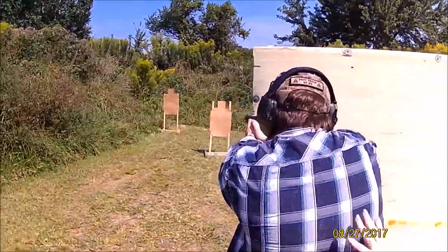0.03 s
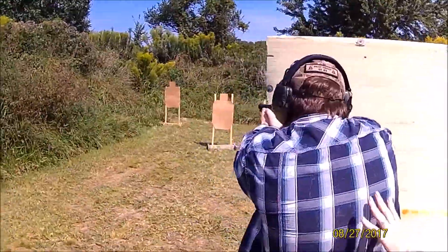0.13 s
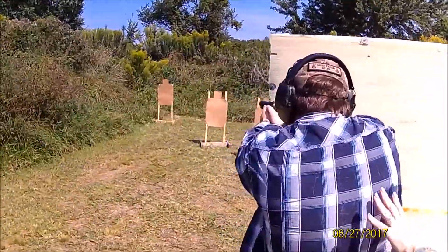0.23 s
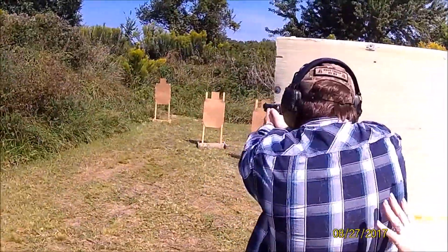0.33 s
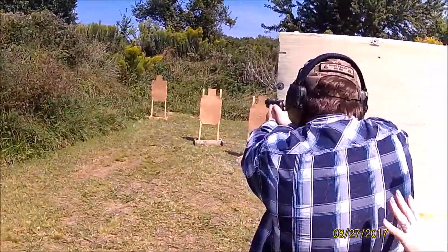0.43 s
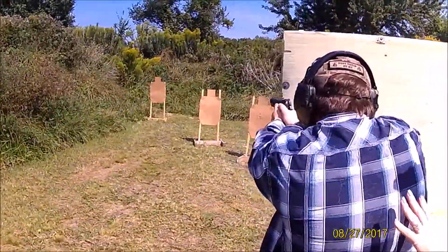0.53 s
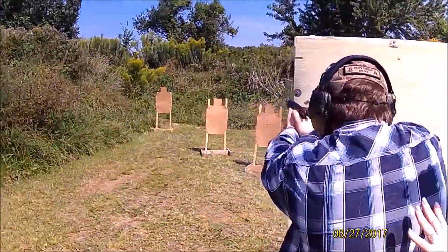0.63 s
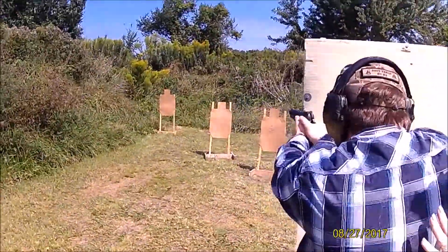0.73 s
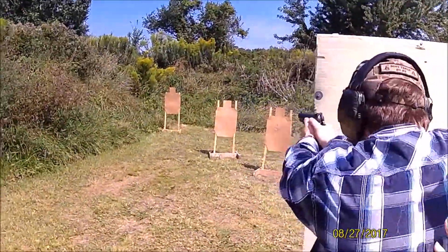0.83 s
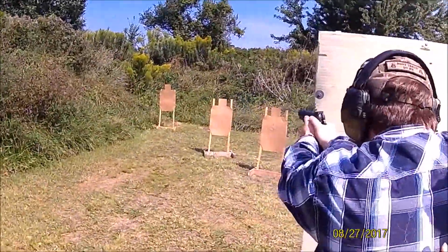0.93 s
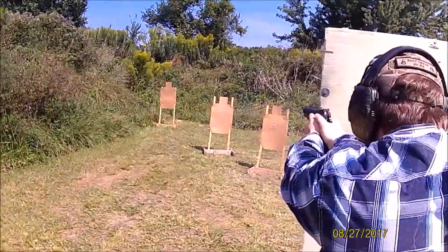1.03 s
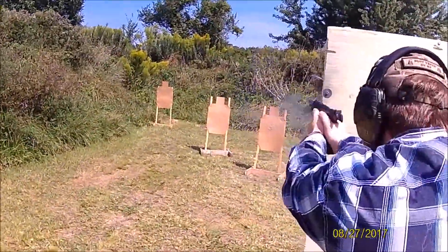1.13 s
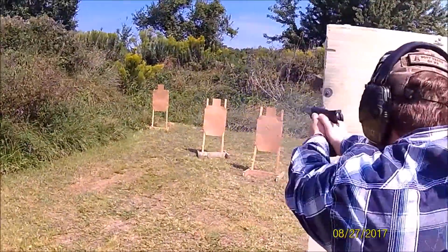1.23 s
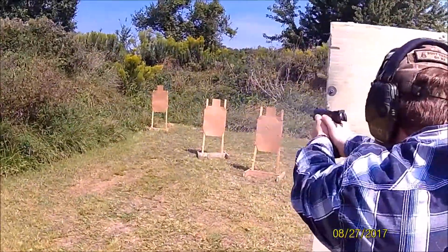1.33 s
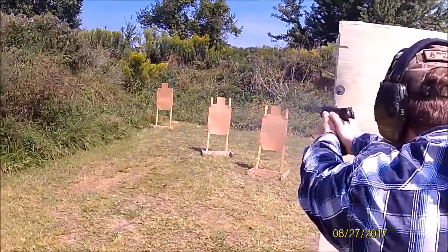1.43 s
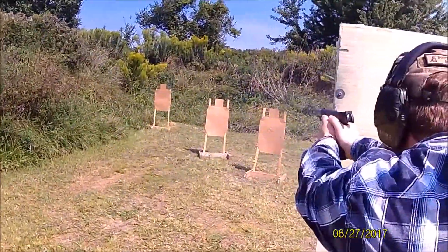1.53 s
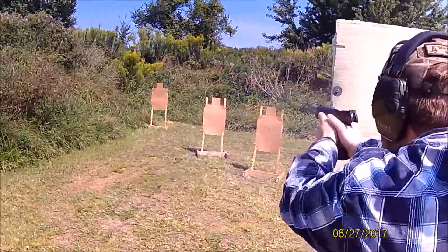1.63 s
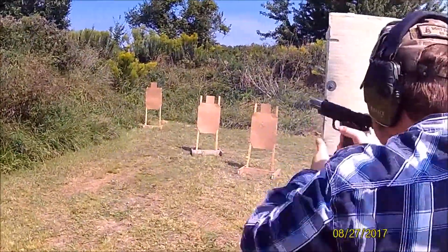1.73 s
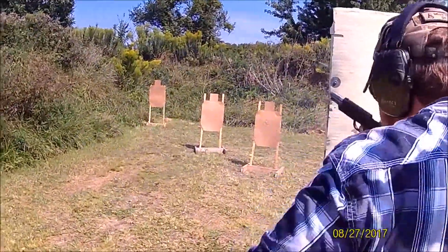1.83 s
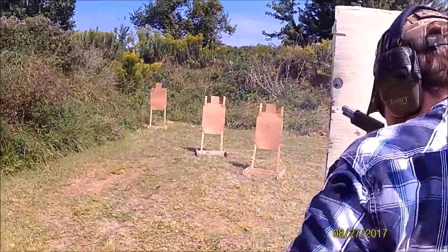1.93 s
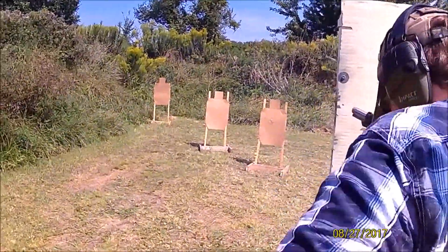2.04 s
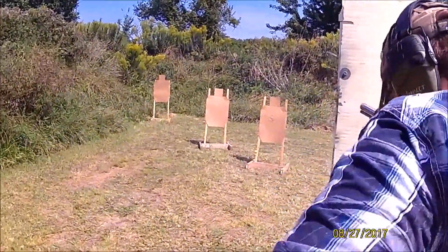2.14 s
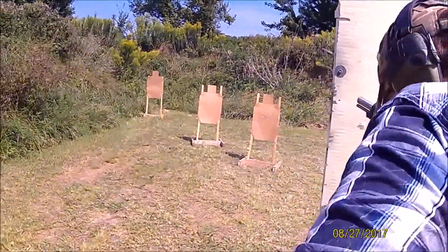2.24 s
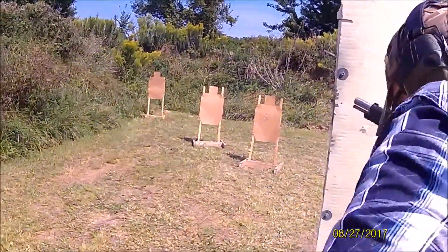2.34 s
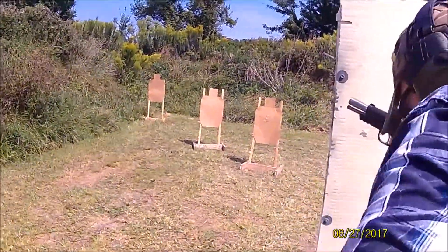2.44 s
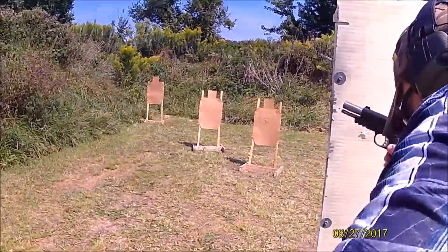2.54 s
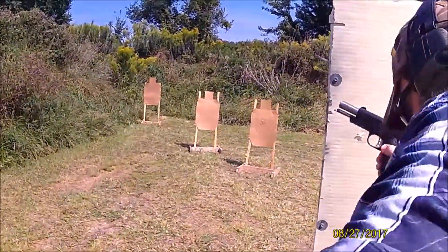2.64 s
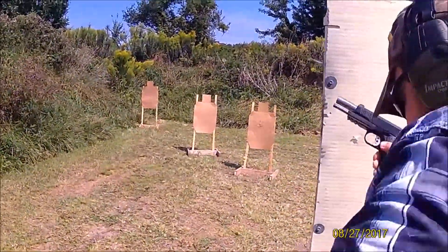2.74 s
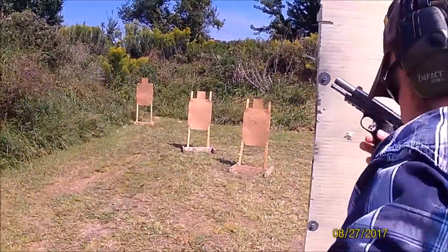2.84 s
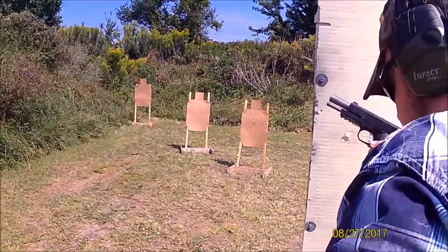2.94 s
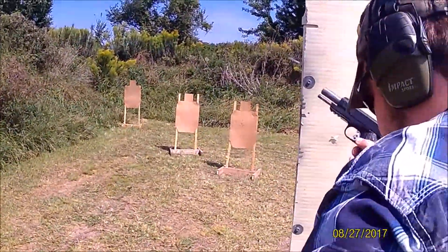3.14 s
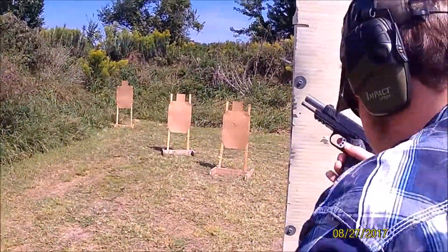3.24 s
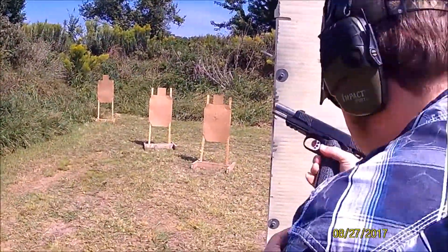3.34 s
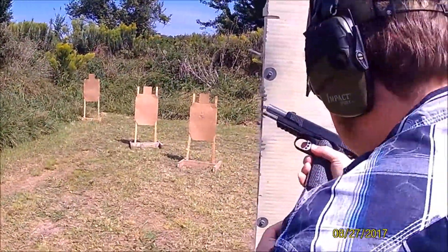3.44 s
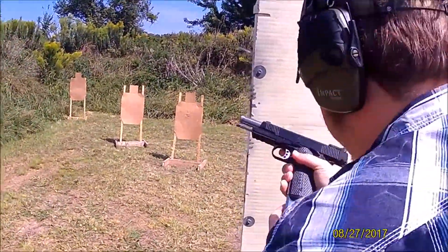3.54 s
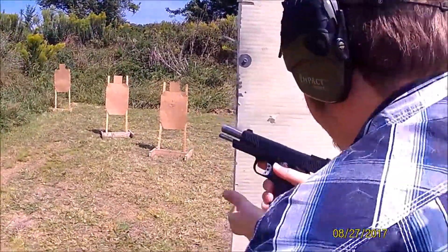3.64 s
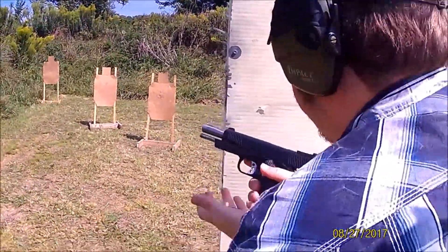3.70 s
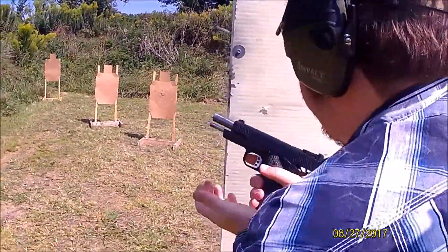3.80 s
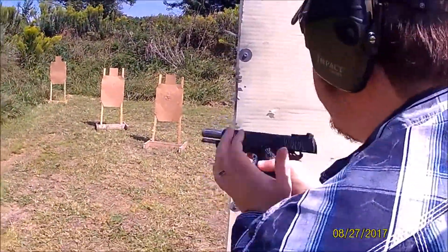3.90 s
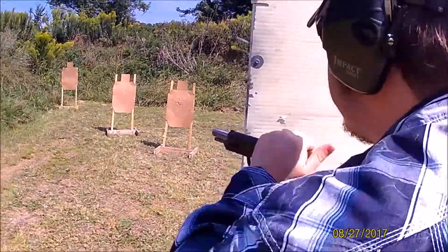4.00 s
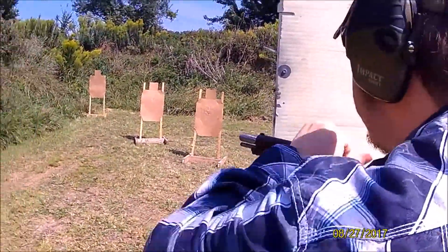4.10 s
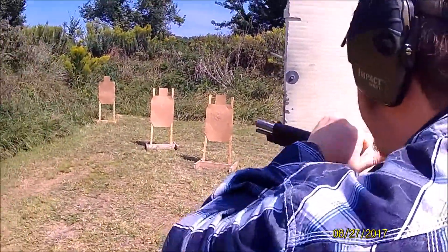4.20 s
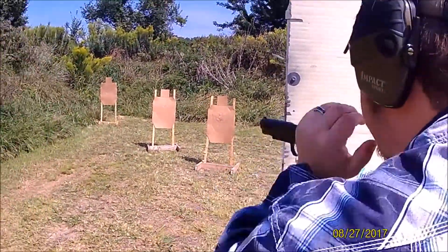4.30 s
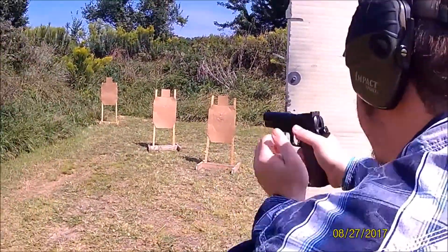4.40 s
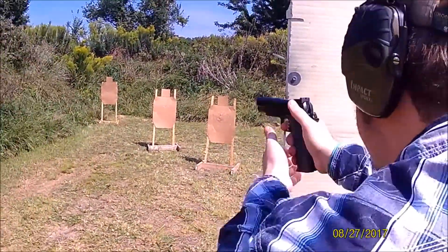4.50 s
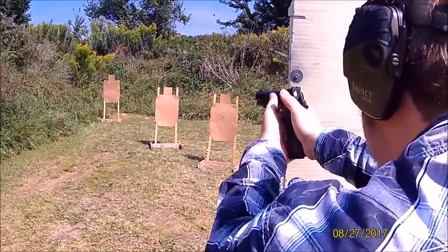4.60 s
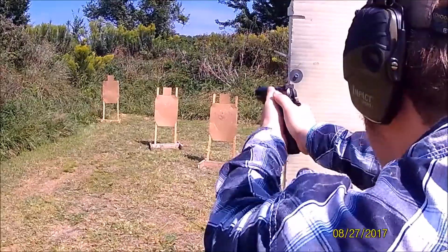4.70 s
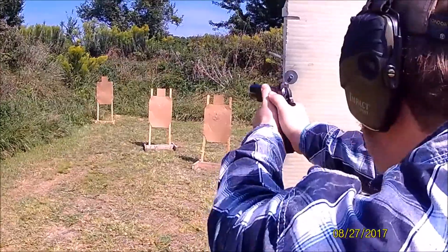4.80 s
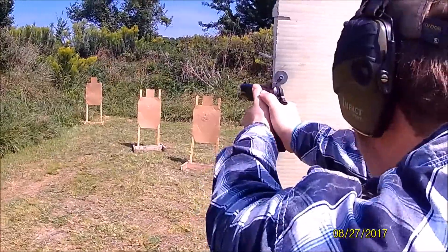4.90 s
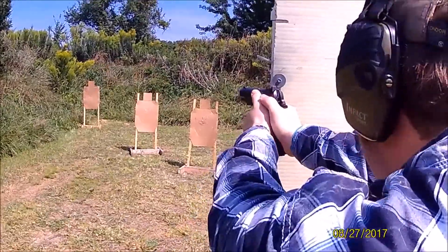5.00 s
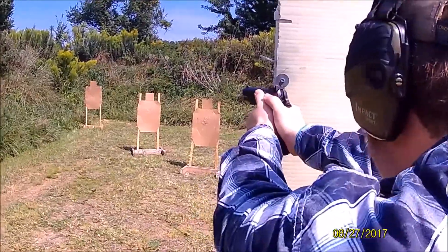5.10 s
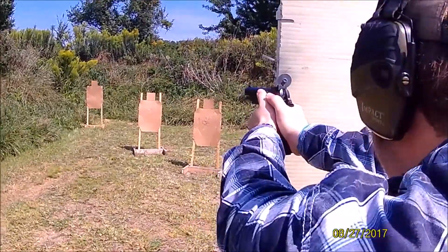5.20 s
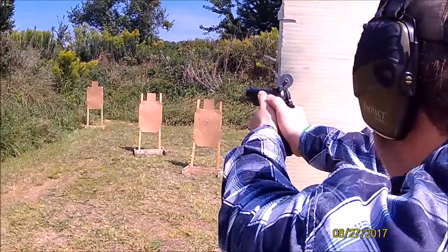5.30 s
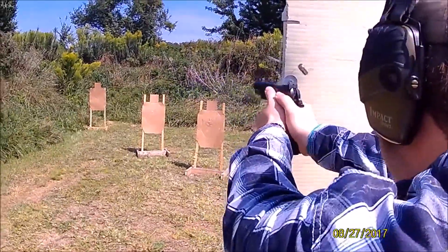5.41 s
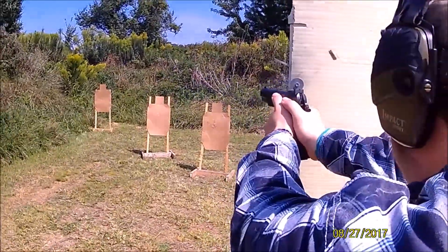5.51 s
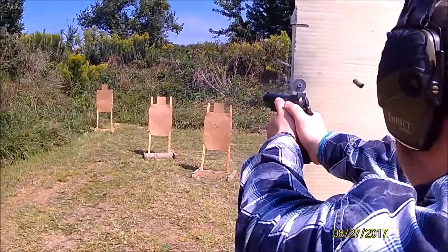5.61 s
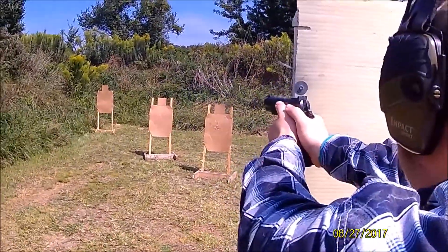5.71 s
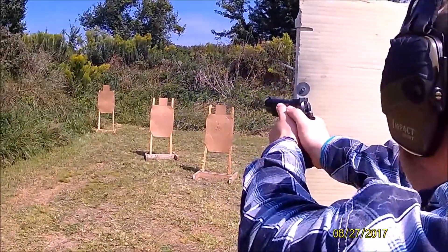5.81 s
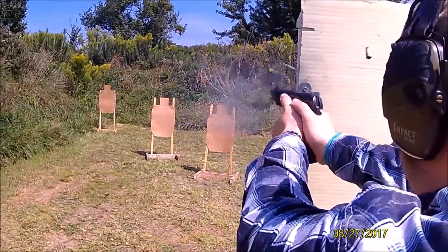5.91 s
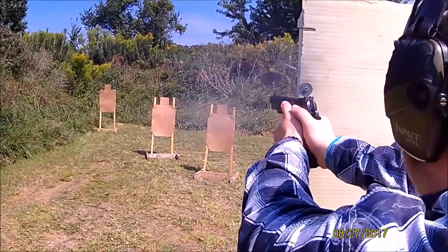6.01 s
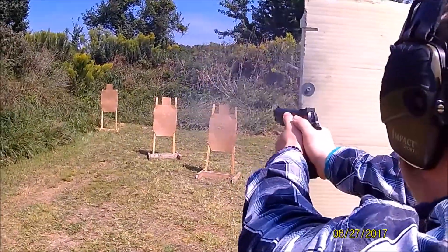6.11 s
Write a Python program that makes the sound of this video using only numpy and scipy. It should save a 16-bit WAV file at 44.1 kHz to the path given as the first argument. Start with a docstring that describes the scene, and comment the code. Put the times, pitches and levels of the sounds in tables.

```python
"""Two pairs of loud, distorted pistol shots, with a reload between them and single shots further off.
It is a match between earth banks, heard from a small hand-held camera just behind the shooter.
The close blasts overload the microphone; shots from the next bay ring its port (the sound hole).
Echoes roll back from the banks. Fingers knock and rub on the camera's shell, and during the reload
the pistol's steel parts click, scrape and slam over a soft bed of open air."""
import sys
import numpy as np
from scipy import signal
from scipy.fft import rfft, irfft, next_fast_len
from scipy.io import wavfile

SR = 44100
rng = np.random.default_rng(int(sys.argv[2]) if len(sys.argv) > 2 else 0)


def master_out(mix):
    """Clip the mix to full scale and print it as 16-bit PCM to the path in sys.argv[1]."""
    frames = np.transpose(np.atleast_2d(mix))
    ceiling = np.clip(frames, -1, 1)
    pcm = np.round(ceiling * 32767).astype(np.int16)
    wavfile.write(sys.argv[1], SR, pcm)


N = 271201
TIME = np.arange(N) / SR

# The shooter's own shots:
# (time [s], blast [dB], slap off the bank [dB], crack time [s], crack [dB], tail [dB])
NEAR_SHOTS = [(0.5867, 18.5, -7, 0.6682, -9.5, -33), (1.0752, 19, 3, 1.1445, -24, -28.5),
              (5.326, 20.5, -6.5, 5.405, -13, -34), (5.8322, 19.5, 0.5, 5.9042, -10.5, -34)]
# Shots in the next bay; t60 always means the time a sound takes to fade by 60 dB:
# (time [s], blast [dB], port pitch [Hz], port t60 [s], overtone [dB], echo [dB])
FAR_SHOTS = [(0.371, 14.5, 1300, 0.015, -24, -31.5), (1.4024, 17, 1263, 0.0094, -11, -27.5),
             (2.4246, 13.5, 1328, 0.0099, -8, -24), (3.4269, 11.5, 1322, 0.02, -40.5, -24),
             (3.6465, 12.5, 1300, 0.021, -36, -24.5)]
# The other tones that the microphone port rings with: (pitch [Hz], level [dB], t60 [s])
PORT_TONES = [(508, -13, 0.019), (800, -8.5, 0.013), (1120, -12.5, 0.004), (4370, -19, .008),
              (5460, -23.5, .005)]
# The tone colour of sharp clicks and thin cracks: (frequency [Hz], level [dB])
CLICK_COLOUR = [(200, -16.5), (700, -18.5), (1300, -0.5), (1900, 2), (2500, -5), (3200, -8), (5500, -12),
                (7500, -23.5), (15000, -28.5)]


def near_shots(port_hz=1350, port_t60=0.045, overtone_hz=2040, overtone_db=-9, overtone_t60=0.056):
    """Each blast rings the port; the bank slaps back, a crack comes from downrange, the tail swells."""
    # The tone colour of the blast: (frequency [Hz], level [dB])
    blast_colour = [(40, -27), (300, -17.5), (500, -10), (900, -8), (1150, -3), (1350, -2.5), (1550, -7.5),
                    (1850, -2.5), (2400, -18.5), (4500, -19.5), (7000, -34), (15000, -50)]
    out = np.zeros(N)
    blast = noise(blast_colour, uneven(spread_db=2.5, rate_hz=550))
    tail = echo_noise(peaks_db=-5.5, crackle_db=5)
    crack = dull(noise(CLICK_COLOUR), hz=8500, order=2)
    tones = [(port_hz, 0, port_t60), (overtone_hz, overtone_db, overtone_t60)] + PORT_TONES
    port = thin(ring(tones), hz=650)
    for s, blast_db, slap_db, crack_s, crack_db, tail_db in NEAR_SHOTS:
        add(out, s, from_db(blast_db) * port)
        fired = TIME >= s
        # Sound scatters off the ground and target stands; one firmer echo comes from close by.
        scatter = fired * from_db(-23.5) * swell(s + 0.037, rise_db_per_s=701, fall_db_per_s=471)
        out += blast * from_db(blast_db) * np.hypot(fade(s, t60=0.067), scatter)
        out += blast * from_db(blast_db - 19.5) * fade(s + 0.039, t60=0.014)
        out += blast * from_db(slap_db) * fade(s + 0.0615, t60=0.031)
        out += crack * from_db(crack_db) * fade(crack_s, t60=0.014)
        # The shot's tail swells back about 0.2 s later, as the camera's level recovers.
        tail_swell = fired * swell(s + 0.19, rise_db_per_s=131, fall_db_per_s=116.5)
        out += tail * from_db(tail_db + 3) * tail_swell
    return out


def far_shots(overtone_hz=2030, overtone_t60=0.019, wall_delay_s=0.0875, wall_db=8):
    """A blast bends over the bank and rings the port; one firm echo and a lumpy roll follow."""
    out, echoes = np.zeros(N), np.zeros(N)
    for s, blast_db, hz, t60, overtone_db, echo_db in FAR_SHOTS:
        port = ring([(hz, 0, t60), (overtone_hz, overtone_db, overtone_t60)] + PORT_TONES)
        add(out, s, from_db(blast_db) * dull(port, hz=5000, order=2))
        add(out, s + wall_delay_s, from_db(echo_db + wall_db) * dull(port, hz=1500, order=2))
        burst = from_db(18) * fade(s, t60=0.033)
        roll = from_db(9) * swell(s + 0.086, rise_db_per_s=236, fall_db_per_s=248)
        late_return = from_db(-23) * swell(s + 0.28, rise_db_per_s=60, fall_db_per_s=129.5)
        echoes += (TIME >= s) * from_db(echo_db) * (burst + np.hypot(roll, late_return))
    return out + echoes * echo_noise(peaks_db=1.5, crackle_db=3) * uneven(spread_db=1.5, rate_hz=120)


def echo_noise(peaks_db, crackle_db):
    """Countless small echoes of uneven size blur into noise, which the microphone port colours."""
    # The tone colour of the echoes: (frequency [Hz], level [dB])
    echo_colour = [(50, -25.5), (250, -28.5), (500, -11), (900, -9.5), (1300, -3.5), (1900, -7.5),
                   (2400, -17), (3600, -24.5), (4400, -20.5), (6200, -32), (6900, -43.5), (10000, -50),
                   (15000, -59)]
    # Narrow bands that the port boosts: (frequency [Hz], width [Hz], level [dB])
    port_peaks = [(1290, 100, 2.5), (1810, 90, -5), (4220, 170, 2.5), (5020, 390, -3.5), (6040, 300, 3.5)]
    echoes = noise(echo_colour, uneven(crackle_db, rate_hz=900))
    echoes += sum(from_db(db + peaks_db) * signal.lfilter(*signal.iirpeak(hz, hz / width, fs=SR), echoes)
                  for hz, width, db in port_peaks)
    return echoes / echoes.std()


def camera_knocks(thud_hz=240, rebound=0.78, case_hz=500, case_db=-8, case_t60=0.031):
    """A clack mostly rings the shell; a fingertip also pushes the whole case, with a hollow thud."""
    # Hard plastic clacks: (time [s], level [dB])
    clacks = [(.0046, -2.5), (0.0401, 0), (0.0828, 0.5)]
    # Soft fingertip bumps: (time [s], shell ring [dB], thud [dB])
    knocks = [(0.8438, -2.5, -7.5), (0.9103, -2, -10.5), (0.959, -14.5, -13.5), (1.011, -6.5, -12),
              (1.184, -5, -29), (1.236, 0, -22), (1.2411, 4, -45), (1.268, -10, -12.5), (1.305, -14.5, -12),
              (1.3477, -12.5, -26), (1.379, -7.5, -10), (1.396, -29, -10.5), (1.4112, 1.5, -4.5),
              (1.4333, -12, -8.5), (1.4834, -9, -5), (4.002, -7.5, -15), (4.0554, -11, -12),
              (4.0935, 2, -2.5), (4.163, -7.5, -6.5)]
    out = np.zeros(N)
    phase = np.pi * (thud_hz * TIME[:SR // 50] - 1)
    thud = (1 - 2 * rebound * phase ** 2) * np.exp(-phase ** 2)  # a brief smooth push and its rebound
    case = ring([(case_hz, case_db, case_t60)])
    for s, db in clacks:
        add(out, s, from_db(db) * shell_ring(bright_hz=4100, damped_t60=1.6, low_hz=707))
        add(out, s - 1 / thud_hz, from_db(db - 21) * thud)
    for s, shell_db, thud_db in knocks:
        bright_hz = 1840 * 2 ** (thud_db / 23.5)  # a firmer push sounds brighter
        add(out, s, from_db(shell_db) * shell_ring(bright_hz) + from_db(thud_db) * case)
        add(out, s - 1 / thud_hz, from_db(thud_db) * thud)
    return out


def shell_ring(bright_hz, damped_t60=0.075, low_hz=600):
    """The struck camera shell ticks and rings; a soft finger dulls the ring and stops it sooner."""
    # The shell's own tones: (pitch [Hz], level [dB], t60 [s])
    shell_tones = [(785, -5, 0.035), (1150, 3, 0.0023), (1328, -12, 0.011), (1988, -14, 0.01),
                   (2855, -15, 0.014), (3700, -15, 0.0087), (4160, -13.5, 0.01), (5700, -14, 0.007),
                   (750, -48.5, 0.71), (1320, -43.5, .18)]
    t = TIME[:SR // 4]
    tones = ring(shell_tones) * from_db(-60 * t / damped_t60)
    tick = rng.standard_normal(len(t)) * from_db(-13 - 60 * t / 0.014)
    return dull(thin(tones + tick, low_hz, order=4), bright_hz, order=2)


def grip_rub(catches_per_s=45, catch_db=11.5, scrape_db=1.5):
    """Skin rubs on the case: it rumbles, scrapes unevenly and catches at random, ticking the shell."""
    # The hand shifts its grip: (time [s], level [dB], held for [s])
    rubs = [(0.847, -13.5, 0.01), (.962, -25, 0.029), (1.071, -32.5, 0.18), (3.612, -30.5, .005),
            (4.024, -39, .06)]
    # The tone colour of skin on the case: (frequency [Hz], level [dB])
    grip_colour = [(30, 4), (110, -3.5), (450, -5.5), (600, -11), (780, -3), (950, -18), (1400, -17.5),
                   (2400, -32.5), (4300, -33), (5300, -45.5), (7300, -43), (9000, -56), (15000, -50.5)]
    pressure = sum(from_db(db) * swell(s, rise_db_per_s=901.5, fall_db_per_s=170, hold_s=hold_s)
                   for s, db, hold_s in rubs)
    scrape = dull(thin(noise(grip_colour), hz=1400), hz=7500, order=2)
    scrape *= from_db(scrape_db) * uneven(spread_db=3, rate_hz=250)
    catches = (rng.random(N) < catches_per_s / SR) * rng.random(N) * from_db(catch_db) * pressure
    rumble = dull(noise(grip_colour), hz=2500)
    ticks = signal.fftconvolve(catches, shell_ring(bright_hz=1100))[:N]
    return pressure * (rumble + scrape) + ticks


def ticks_and_reload(pull_s=4.24, pull_db=-34, slam_db=-20, slam_t60=0.054, slam_bright_hz=12500):
    """The handled camera case ticks; later the gun clicks and its slide scrapes back and slams shut."""
    # Small sharp ticks of the camera case (first second), then the gun's clicks during the reload:
    # (time [s], level [dB], t60 [s], brightness [Hz])
    handling_clicks = [(0.5558, -5, 0.019, 2700), (0.5756, -6, 0.019, 2720), (0.687, -17, 0.012, 3980),
                       (0.724, -18.5, 0.014, 2980), (0.8431, -9, 0.0075, 3850), (3.3203, -22, 0.029, 4800),
                       (3.346, -30, 0.044, 4000), (3.359, -42, 0.036, 6000), (4.113, -31.5, 0.033, 6000)]
    hiss = noise(CLICK_COLOUR)
    slam = (pull_s + 0.0215, slam_db, slam_t60, slam_bright_hz)
    clicks = sum(from_db(db) * dull(hiss * fade(s, t60), bright_hz, order=2)
                 for s, db, t60, bright_hz in handling_clicks + [slam])
    pull = from_db(pull_db) * swell(pull_s, rise_db_per_s=2500, fall_db_per_s=264) * hiss
    return clicks + pull


def steel_rings(rise_s=0.01):
    """Struck steel somewhere on the range sings with one faint tone for each hit."""
    # Hits on distant steel: (time [s], pitch [Hz], level [dB], t60 [s])
    hits = [(.45, 1776, -29.5, 2.1), (2.57, 1770, -34, 0.64), (3.84, 2015, -14, 0.042)]
    out = np.zeros(N)
    for s, hz, db, t60 in hits:
        loudness = from_db(db) * fade(s, t60) * np.tanh(since(s) / rise_s)
        out += loudness * np.sin(2 * np.pi * hz * since(s))
    return out


def woods(near_db=-47, far_db=-42, tail_t60=4.03):
    """Every shot lingers faintly and unevenly in the woods around."""
    # The tone colour of the lingering sound: (frequency [Hz], level [dB])
    woods_colour = [(100, -15), (800, -6), (1300, 4), (1900, 7.5), (2400, -9), (5000, -24.5), (8000, -43.5)]
    # Soft swells in the background: (time [s], level [dB], t60 [s])
    background_swells = [(1.655, -40, 1), (5.16, -50.5, 0.36), (5.235, -51, 0.64)]
    tails = [(shot[0], near_db, tail_t60) for shot in NEAR_SHOTS]
    tails += [(shot[0], far_db, tail_t60) for shot in FAR_SHOTS]
    power = sum((from_db(db) * fade(s, t60)) ** 2 for s, db, t60 in tails + background_swells)
    flutter = uneven(spread_db=2, rate_hz=14)
    return np.sqrt(power) * noise(woods_colour) * flutter


def open_air(level_db=-43):
    """The steady low rumble and faint hiss of the outdoors."""
    # The tone colour of the air: (frequency [Hz], level [dB])
    air_colour = [(15, -26.5), (25, 3), (116, -10.5), (140, -12), (227, -18), (260, -21.5), (331, -22.5),
                  (762, -27.5), (970, -30), (1410, -30), (2850, -39.5), (4260, -41), (10100, -48.5),
                  (13200, -49), (15500, -48)]
    return from_db(level_db) * noise(air_colour)


def whine(centre_hz=13330, wander_hz=90, level_db=-64):
    """A thin, unsteady whistle from the camera's electronics."""
    wander = dull(rng.standard_normal(N), hz=150)
    pitch_hz = centre_hz + wander_hz * wander / wander.std()
    return from_db(level_db) * np.sin(2 * np.pi * np.cumsum(pitch_hz) / SR)


def background_dips(depth_db=-8.5, sink_s=0.06, recover_s=0.0083):
    """A gain that dips briefly after loud sounds and comes back quickly."""
    # When the background is quieter: (start [s], end [s])
    dips = [(.07, 0.24), (.6, 0.6), (1.1, 1.64), (5.35, 5.57), (5.86, 6.14)]
    depth = sum(np.clip(np.minimum((TIME - start) / sink_s, (end - TIME) / recover_s), 0, 1)
                for start, end in dips)
    return from_db(depth_db * depth)


def from_db(db):
    """Turn decibels into a gain, the number that a sound is multiplied by."""
    return 10 ** (np.asarray(db) / 20)


def noise(colour, grain=1):
    """Noise of strength (rms) 1 with a (Hz, dB) tone colour; grain roughens it before it is coloured."""
    hz, db = np.transpose(colour)
    size = next_fast_len(N)
    bin_hz = np.maximum(np.arange(size // 2 + 1) * SR / size, 1)
    gain = from_db(np.interp(np.log(bin_hz), np.log(hz), db))
    gain *= bin_hz / np.hypot(bin_hz, 20)  # falls away below 20 Hz
    x = irfft(rfft(rng.standard_normal(N) * grain, size) * gain, size)[:N]
    return x / x.std()


def since(s):
    """Seconds gone by since time s, zero before."""
    return np.maximum(TIME - s, 0)


def fade(s, t60):
    """A gain that jumps to 1 at time s and dies away."""
    return (TIME >= s) * from_db(-60 * np.minimum(since(s) / t60, 4))


def swell(s, rise_db_per_s, fall_db_per_s, hold_s=0):
    """A gain that climbs to 1 at time s, holds, and falls away."""
    db = rise_db_per_s * np.maximum(s - TIME, 0) + fall_db_per_s * since(s + hold_s)
    return from_db(-np.minimum(db, 240))


def uneven(spread_db, rate_hz):
    """A gain that wanders at random around 1."""
    wander = dull(rng.standard_normal(N), rate_hz, order=2)
    return from_db(spread_db * wander / wander.std())


def ring(tones):
    """A quarter of a second of fading (Hz, dB, t60) tones, struck together."""
    t = TIME[:SR // 4]
    return sum(from_db(db - 60 * t / t60) * np.sin(2 * np.pi * hz * t) for hz, db, t60 in tones)


def dull(x, hz, order=1):
    """Soften everything above hz (a low-pass filter)."""
    return signal.sosfilt(signal.butter(order, hz, fs=SR, output="sos"), x + 1e-18)


def thin(x, hz, order=2):
    """Soften everything below hz (a high-pass filter)."""
    return signal.sosfilt(signal.butter(order, hz, "high", fs=SR, output="sos"), x + 1e-18)


def add(track, s, sound):
    """Mix a sound into the track from time s on."""
    start = max(round(s * SR), 0)
    track[start:start + len(sound)] += sound[:N - start]


def scene():
    """Shots and handling over the open-air background, in one channel."""
    background = (open_air() + woods() + whine()) * background_dips()
    shooting = near_shots() + far_shots() + steel_rings()
    return (shooting + camera_knocks() + grip_rub() + ticks_and_reload() + background)[None]


def record(dry, overload_power=0.45, power_ramp=0.04, duck_db=6.5, recover_db_per_s=80):
    """The camera flattens loud peaks, briefly turns itself down when overloaded and cuts the top treble."""
    frame_s, frame_start_s, cutoff_hz = 0.02, 0.0102, 15900
    clipped = dry[0] / (1 + dry[0] ** 8) ** (1 / 8)
    # The average power of the last short frame decides how far the level ducks.
    energy = np.cumsum(clipped ** 2) / SR
    frame_end = TIME - (TIME - frame_start_s) % frame_s
    power = (np.interp(frame_end, TIME, energy) - np.interp(frame_end - frame_s, TIME, energy)) / frame_s
    wanted_db = duck_db * np.clip((power - overload_power) / power_ramp, 0, 1)
    recovery_db = recover_db_per_s * TIME
    cut_db = np.maximum.accumulate(wanted_db + recovery_db) - recovery_db  # drop at once, creep back
    treble_cut = signal.ellip(10, 0.1, 70, cutoff_hz, fs=SR, output="sos")
    return signal.sosfilt(treble_cut, clipped * from_db(-cut_db))[None]


dry = scene()
out = record(dry)
master_out(out)
```